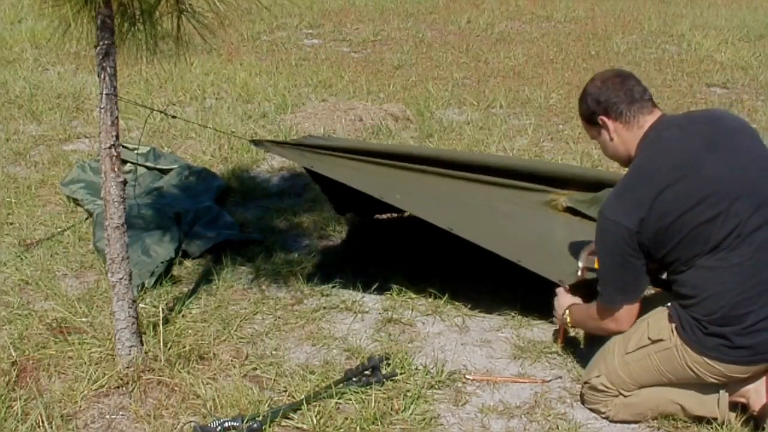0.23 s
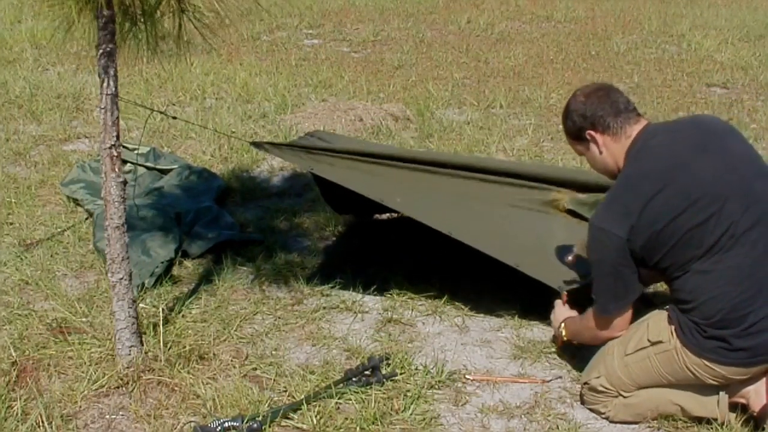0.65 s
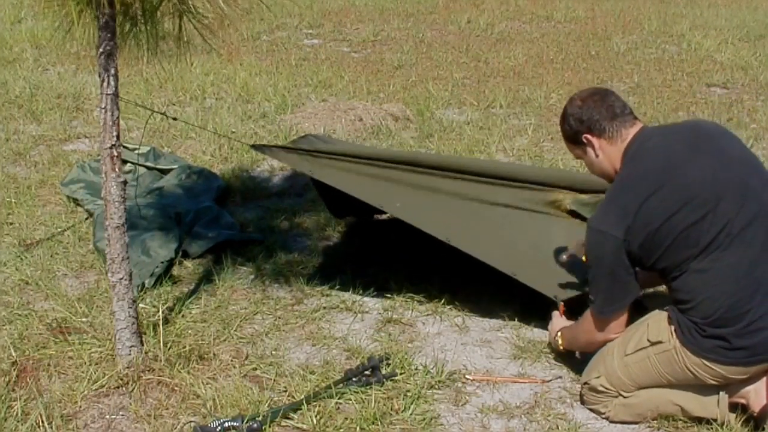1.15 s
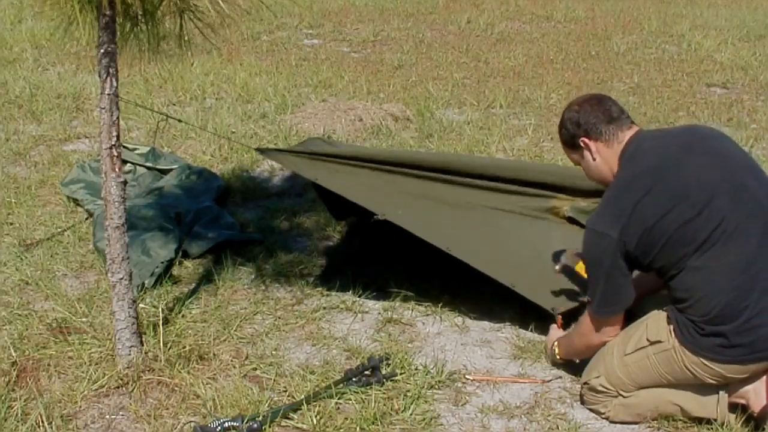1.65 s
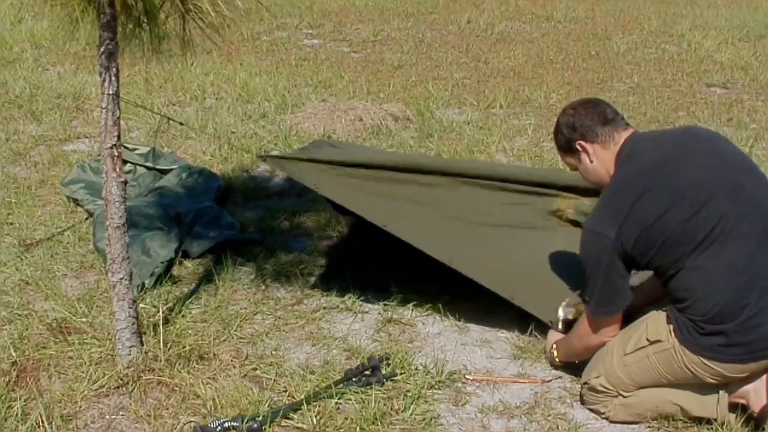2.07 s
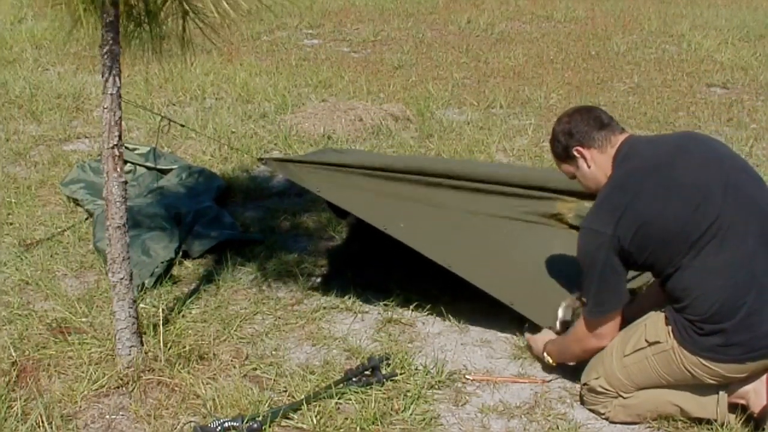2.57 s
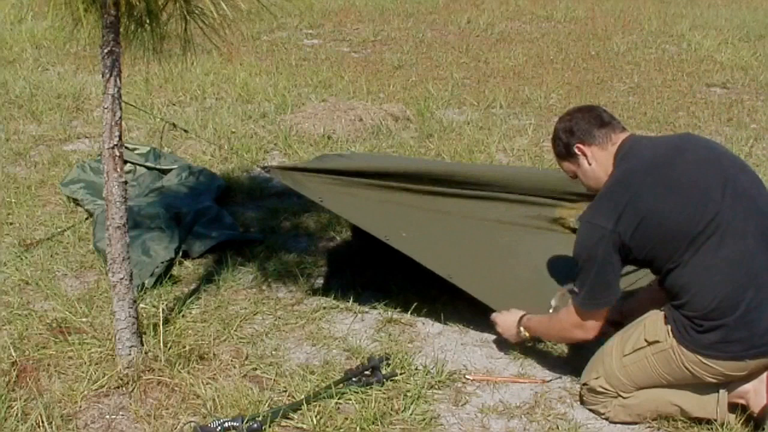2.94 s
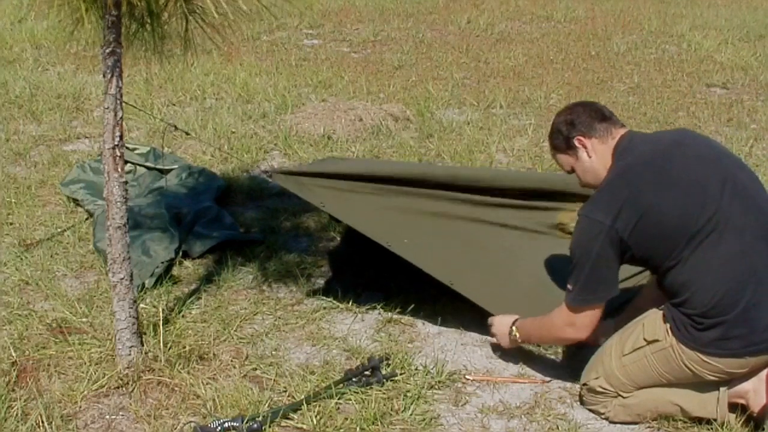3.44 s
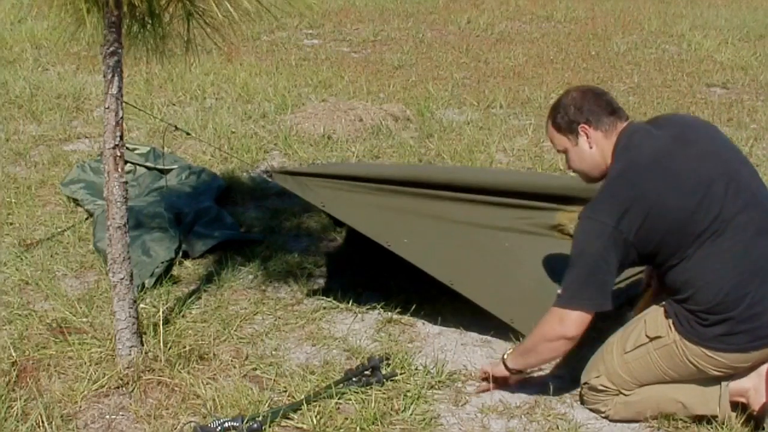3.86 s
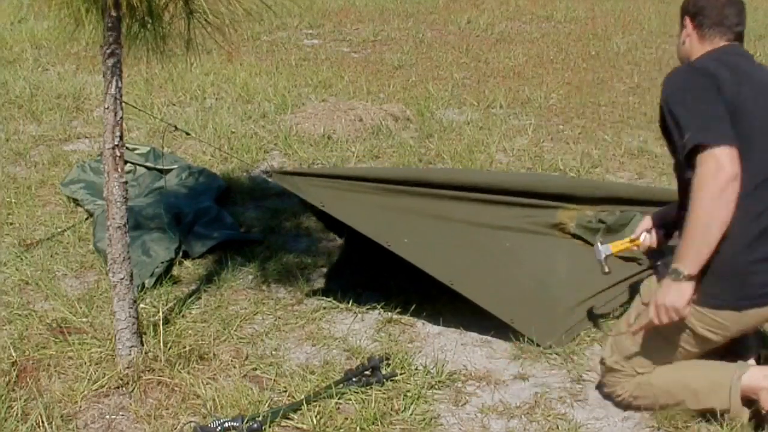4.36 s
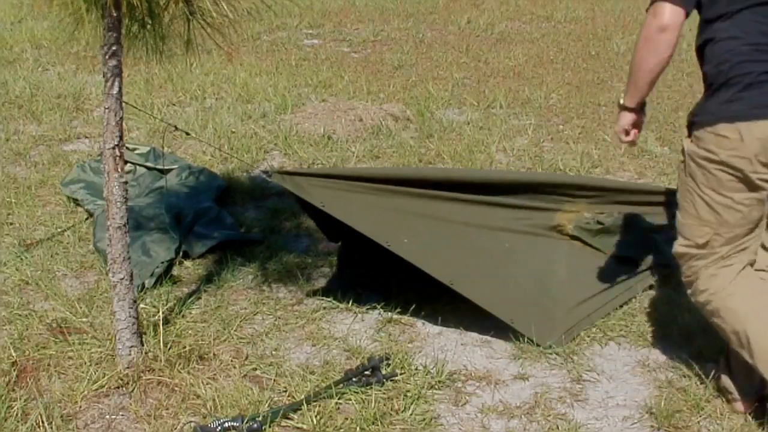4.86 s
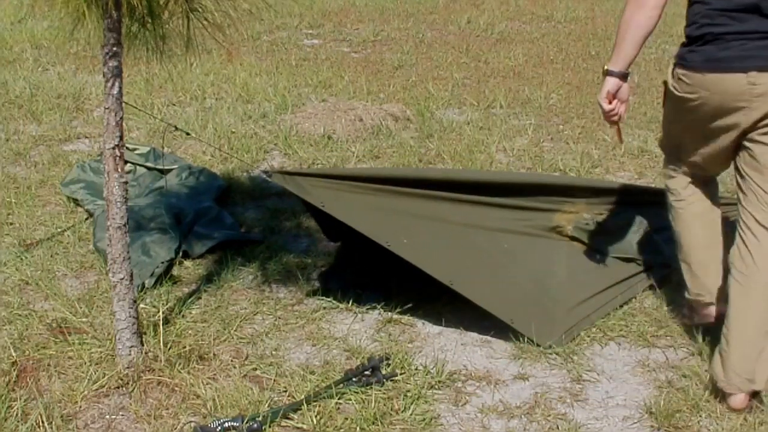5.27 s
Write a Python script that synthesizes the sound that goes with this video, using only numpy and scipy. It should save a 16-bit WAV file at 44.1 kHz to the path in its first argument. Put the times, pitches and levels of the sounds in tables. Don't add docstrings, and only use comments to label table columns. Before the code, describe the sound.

Close, nearly centred and distorted on a small hissy stereo microphone, a run of twelve hard metallic clanks drives a stake into gritty ground, about four per second. Wind puffs bump the microphone, leaves and insects hiss thinly, and far birds give falling whistles. After the last, duller blow it turns quiet, then dry grass crackles underfoot and a sole squeaks.

```python
import sys
import numpy as np
from scipy import signal
from scipy.fft import rfft, irfft
from scipy.io import wavfile
from scipy.ndimage import uniform_filter1d

SR = 44100
rng = np.random.default_rng(int(sys.argv[2]) if len(sys.argv) > 2 else 0)


def generate_wav(sig):
    pcm = np.round(np.clip(np.atleast_2d(sig).T, -1, 1) * 32767).astype(np.int16)
    wavfile.write(sys.argv[1], SR, pcm)


def gain_from_decibels(decibels):
    exponent = np.asarray(decibels, float) / 20
    return 10 ** exponent


N = 243022


def evened(x):
    return x / np.sqrt(np.mean(x ** 2) + 1e-20)


def add(mix, start_s, sound):
    part = mix[max(round(start_s * SR), 0):][:len(sound)]
    part += sound[:len(part)]


def coloured(x, spectrum):
    f, db = np.transpose(spectrum)
    hz = np.fft.rfftfreq(x.shape[-1], 1 / SR)
    gain = gain_from_decibels(np.interp(np.log(hz + 1), np.log(f), db))
    return evened(irfft(rfft(x) * gain, x.shape[-1]))


def resonate(x, hz, width_hz):
    turn = np.exp(2j * np.pi * np.cumsum(hz * np.ones(len(x))) / SR)
    r = np.exp(-np.pi * width_hz / SR)
    return 2 * (turn * signal.lfilter([1 - r], [1, -r], x / turn)).real


def grit(count, spread_db, grains_per_s):
    strength = gain_from_decibels(spread_db * np.minimum(rng.exponential(1, count), 4))
    grains = strength * (rng.random(count) < grains_per_s / SR)
    return rng.standard_normal(count) * (1 + signal.lfilter([1], [1, -.97], grains))


def swell(length_s, edge_db):
    u = np.linspace(0, 1, round(length_s * SR))
    return u, gain_from_decibels(edge_db * (2 * u - 1) ** 2) * signal.windows.tukey(len(u), .15)


def wind():
    # time in seconds, level in dB.
    breeze = [(0.0, -68), (0.75, -59), (1.64, -56), (1.81, -57.5), (2.21, -56), (2.49, -57), (2.87, -63),
              (3.15, -62), (3.59, -67), (3.99, -64.5), (5.02, -76.5), (5.51, -76)]
    # time in seconds, level in dB, frequency in Hz.
    puffs = [(.291, -43, 164), (.317, -47, 131), (.366, -42, 247), (.485, -39.5, 151), (.576, -41.5, 143),
             (0.766, -38, 158), (.797, -28.5, 228), (.82, -28, 251), (.859, -33.5, 186), (.884, -34, 240),
             (1.357, -38, 310), (1.43, -38.5, 162), (1.46, -18.5, 355), (1.479, -35, 216),
             (1.643, -38, 191), (1.732, -31.5, 320), (2.032, -36, 228), (2.151, -29, 210),
             (2.256, -39, 172), (1.15, -46, 110), (2.297, -40, 186), (2.677, -36.5, 393), (2.76, -38, 174),
             (2.969, -39.5, 186), (3.153, -33, 119), (3.203, -30, 423), (3.23, -26.5, 159),
             (3.362, -42, 213), (3.486, -37, 237), (4.17, -48, 128)]
    lumps = gain_from_decibels(8.0 * coloured(rng.standard_normal(N), [(10, 3), (45, 14), (90, -53)]))
    rumble = coloured(rng.standard_normal(N) * lumps,
                      [(20, -24), (60, 5.5), (120, 4.5), (250, -3.5), (500, -23), (900, -62)])
    out = rumble * gain_from_decibels(np.interp(np.arange(N) / SR, *np.transpose(breeze)) + 2.0)

    scatter_s, small_db, small_hz = 0.0252, -10.5, 125
    s, db, _ = np.repeat(puffs, 2, axis=0).T
    lag, size, pitch = rng.standard_normal((len(s), 3)).T
    level_db = np.minimum(db, -32.0) + small_db + 2.4 * size
    small = np.transpose([s + scatter_s * lag, level_db, small_hz * np.exp(.2 * pitch)])

    t = np.arange(-1024, 1024) / SR
    eddies = [*puffs, *small]
    for (s, db, hz), phase in zip(eddies, rng.random((len(eddies), 1))):
        envelope = gain_from_decibels(db + 3.5) * np.exp(-abs(t * hz / 0.5) ** 1.18)
        add(out, s - 1024 / SR, envelope * np.cos(2 * np.pi * (hz * t + phase)))
    return out


def field():
    # frequency in Hz, density in dB per Hz.
    leaves = [(120, -33), (200, -19.5), (350, -7), (600, -4.5), (1050, 1), (1500, -3), (2200, -5.5),
              (3300, -7), (5000, -14), (9000, -21), (15000, -39), (15900, -50)]
    air_db, rise_db_per_s = -46, 0.1352
    _, _, z = signal.stft(coloured(rng.standard_normal(N), leaves), nperseg=512)
    patches = uniform_filter1d(rng.standard_normal(z.shape), size=6, axis=0)
    patches = uniform_filter1d(patches, size=8, axis=1)
    air = evened(signal.istft(z * gain_from_decibels(1.65 * evened(patches)), nperseg=512)[1][:N])
    low_insect = gain_from_decibels(-61.5) * evened(resonate(rng.standard_normal(N), 3297, 14.0))
    high_insect = gain_from_decibels(-64) * evened(resonate(rng.standard_normal(N), 7880, 60.0))
    return air * gain_from_decibels(air_db + rise_db_per_s * np.arange(N) / SR) + low_insect + high_insect


def preamp_hiss(shape):
    # frequency in Hz, density in dB.
    hiss = [(200, -14), (1000, -4), (4000, 0), (8000, .5), (12000, -1), (15000, -2.5), (15600, -6),
            (15900, -25)]
    return gain_from_decibels(-45.5) * coloured(rng.standard_normal(shape), hiss)


def rustles():
    # centre in seconds, level in dB, frequency in Hz, length in seconds.
    brushes = [(0.208, -44, 1390, 0.014), (0.479, -49, 1200, 0.023), (0.708, -44, 910, 0.011),
               (1.677, -41.5, 2500, 0.029), (3.252, -40.5, 2500, 0.0096), (3.96, -49, 1190, 0.036),
               (4.223, -50, 900, 0.029), (4.716, -45, 4940, 0.014), (5.244, -49, 5000, 0.013),
               (5.486, -42, 2600, 0.02), (5.424, -51, 3200, 0.016)]
    out = np.zeros(N)
    t = np.arange(-4096, 4096) / SR
    for s, db, hz, length_s in brushes:
        body = evened(resonate(grit(len(t), spread_db=0.5, grains_per_s=380), hz, 0.78 * hz))
        add(out, s - 4096 / SR, gain_from_decibels(db) * body * np.exp(-(t / length_s) ** 2))
    return out


def blow(ring_db, crack_db, chatter_t60_s, soil_db, thud_db):
    # frequency in Hz, density in dB per Hz.
    crack_spectrum = [(90, -16.5), (250, -12), (1500, -12), (2600, -7), (4000, -3), (6000, -6.5),
                      (8000, -7.5), (11000, -16.5), (15000, -19), (17000, -62)]
    # frequency in Hz, level in dB, t60 in seconds.
    head_modes = [(6228, 0, .092), (10120, -16, .08), (2330, -21, .09), (14010, -24, .055)]
    # frequency in Hz, density in dB per Hz.
    soil_spectrum = [(150, -14), (400, -6), (1000, 0), (2500, -1), (4500, -6), (8000, -14), (12000, -24),
                     (16000, -36)]
    thud_hz, thud_t60_s, soil_t60_s = 314, .011, .19
    t = np.arange(8192) / SR
    crack = coloured(rng.standard_normal(len(t)), crack_spectrum)
    crack *= gain_from_decibels(crack_db - 60 * (t / max(chatter_t60_s, .008)) ** 1.172)
    ring = sum(gain_from_decibels(db - 60 * t / t60_s) * np.sin(2 * np.pi * (hz * t + rng.random()))
               for hz, db, t60_s in head_modes)
    ring *= gain_from_decibels(ring_db) * (1 - np.exp(-t / .002)) * (1 + np.exp(-t / .008))
    thud = gain_from_decibels(thud_db - 60 * t / thud_t60_s) * np.sin(2 * np.pi * thud_hz * t)
    soil = coloured(grit(len(t), spread_db=1.0, grains_per_s=300), soil_spectrum)
    soil *= gain_from_decibels(soil_db - 60 * t / soil_t60_s)
    return (crack + soil) * np.minimum(t / 0.00017, 1) + ring + thud


def clank(db, hz, t60_s):
    t = np.arange(2048) / SR
    waver = 1 + .03 * evened(uniform_filter1d(rng.standard_normal(len(t)), size=40))
    turns = np.cumsum(hz * waver) / SR + rng.random()
    pair = np.sin(2 * np.pi * turns) + .4 * np.sin(2 * np.pi * (turns * 1.04 + rng.random()))
    return gain_from_decibels(db + 7.5 - 60 * t / max(t60_s, .006)) * (1 - np.exp(-t / 0.00022)) * pair


def echoes(x):
    # delay in seconds, level in dB, spread in seconds.
    reflectors = [(.0395, -41, 0.00073), (0.058, -50, .008), (0.098, -45, 0.014), (.113, -54, 0.0031)]
    # frequency in Hz, level in dB.
    bark = [(600, -40), (2000, 9.5), (4500, -2), (7500, -3), (10000, 1), (16000, -3.5)]
    t = np.arange(8192) / SR
    spots = sum(gain_from_decibels(db) * np.exp(-((t - delay_s) / spread_s) ** 2) / np.sqrt(spread_s * SR)
                for delay_s, db, spread_s in reflectors)
    return signal.fftconvolve(x, spots * coloured(rng.standard_normal(len(t)), bark))[:N]


def hammer():
    # start in seconds, crack in dB, chatter t60 in seconds, head ring in dB, thud in dB.
    blows = [(0.7802, -3, 0.031, -23.5, -10.5), (1.0534, 0, 0.018, -28, -22),
             (1.3154, 2.5, 0.028, -15.5, -11), (1.5764, 4, 0.027, -22, -18), (1.8365, 2.5, 0.023, -5, -18),
             (2.1074, 1.5, 0.024, -10.5, -23), (2.3811, 1.5, 0.026, -17.5, -10),
             (2.653, 4.5, 0.023, -22, -30), (2.9177, 4, 0.0087, -30, -21), (2.9242, -11.5, 0.017, -40, -21),
             (3.1742, -2.5, 0.028, -19.5, -44), (3.4437, -0.5, 0.02, -25, -19),
             (3.7198, -8, 0.024, -16, -11)]
    # frequency in Hz, level in dB, t60 in seconds, lag in seconds.
    stake_modes = [(7880, -3.5, 0.0089, .0008), (3450, -11, 0.01, .002), (7000, -18.5, 0.028, .0015),
                   (5810, -10.5, 0.015, .002), (4470, -22, 0.013, 0.0026)]
    # start in seconds, level in dB, frequency in Hz,
    # t60 in seconds.
    contacts = [(.7798, 2.5, 5570, 0.0084), (0.784, -0.5, 4770, 0.0094), (1.0533, -2.5, 4853, 0.025),
                (1.3156, 3, 5273, .016), (1.3171, 0, 7000, 0.017), (1.318, 0.5, 3630, 0.018),
                (1.5759, 5, 5633, .02), (1.5778, -3, 1810, 0.0076), (1.5781, 4.5, 4752, 0.016),
                (1.5814, -1.5, 3694, 0.022), (1.837, 5, 6890, 0.013), (2.1081, 6, 6000, 0.0071),
                (2.1077, -1.5, 3740, 0.015), (2.3807, 1.5, 7880, 0.011), (2.3819, -8, 5320, 0.02),
                (2.3844, -9, 3570, 0.03), (2.6545, 0.5, 5860, .018), (2.6551, 1.5, 2030, 0.0077),
                (2.918, -4.5, 4640, 0.013), (2.9173, -3, 2980, 0.0093), (2.9253, 1, 3174, 0.0091),
                (3.1747, -3, 2060, 0.0045), (3.176, -8, 3850, 0.014), (3.4431, 2.5, 2553, 0.0065),
                (3.4431, -2, 3307, 0.011), (3.4438, 1, 1690, .006), (3.444, -7, 5870, 0.027),
                (3.4474, -3, 4300, .006), (3.7197, 4.5, 1855, 0.005), (3.7208, -7.5, 4280, 0.011)]
    # time in seconds, level in dB.
    exposed = [(.7, 4), (1.7, -5), (1.8, -4), (2.3, 6), (2.6, -2.5), (3.3, -13), (3.8, -21)]
    crunch_db, loose_db, packing_s = -27.5, -16.5, 0.35
    sink_db_per_s, scatter_db, scatter_share = -4, 1.5, 0.022

    out = np.zeros(N)
    starts = np.transpose(blows)[0]
    chances = rng.standard_normal((len(blows), len(stake_modes), 2))
    for (s, crack_db, chatter_t60_s, ring_db, thud_db), chance in zip(blows, chances):
        driven_s = s - starts[0]
        soil_db = crunch_db + loose_db * np.exp(-driven_s / packing_s)
        add(out, s, blow(ring_db, crack_db, chatter_t60_s, soil_db, thud_db))
        for (hz, db, t60_s, lag_s), (a, b) in zip(stake_modes, chance):
            mode_db = db + sink_db_per_s * driven_s + scatter_db * a
            add(out, s + lag_s, clank(mode_db, hz * (1 + scatter_share * b), t60_s))
    for s, db, hz, t60_s in contacts:
        nearest_s = starts[abs(starts - s).argmin()]
        add(out, max(s, nearest_s - .0001), clank(db, hz, t60_s))
    exposure = gain_from_decibels(np.interp(np.arange(N) / SR, *np.transpose(exposed)))
    return out + echoes(out * exposure)


def whistle(hz):
    fuzz = evened(resonate(rng.standard_normal(len(hz)), hz, 40.0))
    return np.sin(2 * np.pi * np.cumsum(hz) / SR) * np.sqrt(2) + .3 * fuzz


def birds():
    # start in seconds, length in seconds, start in Hz, end in Hz, level in dB.
    falls = [
        (2.52, .2, 3560, 3310, -50),
        (2.735, .05, 3280, 3140, -49),
        (3.327, .038, 3620, 3550, -45),
        (3.385, .14, 3530, 3365, -47),
        (3.54, .14, 3345, 3010, -52),
    ]
    # start in seconds, length in seconds, middle in Hz, droop at the ends as a share, level in dB.
    arches = [
        (2.84, .1, 1425, .11, -47),
        (3.487, .088, 1430, .13, -45),
        (4.175, .08, 1415, .1, -47.5),
        (3.812, .045, 6900, -.17, -52),
    ]
    bend, edge_db = 1.19, -9
    out = np.zeros(N)
    for s, length_s, start_hz, end_hz, db in falls:
        u, gain = swell(length_s, edge_db)
        add(out, s, gain_from_decibels(db) * gain * whistle(start_hz + (end_hz - start_hz) * u ** bend))
    for s, length_s, hz, droop, db in arches:
        u, gain = swell(length_s, edge_db)
        add(out, s, gain_from_decibels(db) * gain * whistle(hz * (1 - droop * (2 * u - 1) ** 2)))
    return out


def feet():
    # peak in seconds, level in dB, release in dB per second.
    treads = [(4.46, -47, 150), (4.656, -38, 200), (4.69, -46.5, 90), (5.075, -49, 300), (5.21, -50, 100),
              (5.234, -39.5, 298), (5.414, -45.5, 40)]
    # start in seconds, length in seconds, start in Hz, end in Hz, level in dB.
    scrapes = [
        (5.319, 0.086, 1250, 1600, -45),
        (5.39, .04, 3000, 3600, -46),
        (5.469, 0.015, 3800, 4050, -32),
        (5.48, 0.0132, 3950, 4400, -37),
        (5.489, 0.033, 4200, 5000, -42),
    ]
    rise_db_per_s, grass_hz, grass_width_hz = 900, 2190, 1420.0
    stir_s, stir_db = 4.48, -52
    t = np.arange(N) / SR
    steps = sum(gain_from_decibels(db + np.minimum(rise_db_per_s * (t - s), release * (s - t))) for s, db, release in treads)
    stir = gain_from_decibels(stir_db) * np.clip((t - stir_s) / 0.12, 0, 1)
    grass = evened(resonate(grit(N, spread_db=3.5, grains_per_s=600), grass_hz, grass_width_hz))
    out = (steps + stir) * grass
    for s, length_s, start_hz, end_hz, db in scrapes:
        u, gain = swell(length_s, -7.0)
        hz = start_hz + (end_hz - start_hz) * u
        rub = resonate(rng.standard_normal(len(u)), hz, 520.0)
        add(out, s, gain_from_decibels(db) * gain * evened(resonate(rub, hz, 520.0)))
    return out


def scene():
    blows = hammer()
    side = gain_from_decibels(-21.5) * np.gradient(blows)
    return blows + np.array([side, -side]) + wind() + field() + rustles() + birds() + feet()


def low_pass(x):
    return signal.sosfilt(signal.butter(12, 16300, fs=SR, output="sos"), x)


def record(dry):
    mix = np.clip(dry + preamp_hiss(dry.shape), -1, 1)
    return low_pass(mix)


dry = scene()
out = record(dry)
generate_wav(out)
```